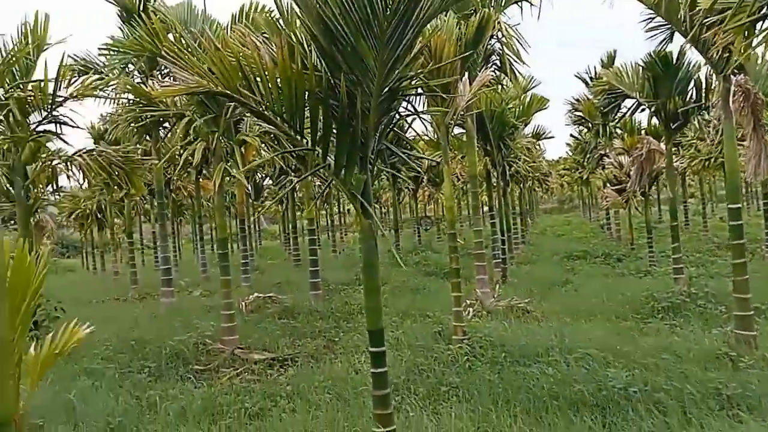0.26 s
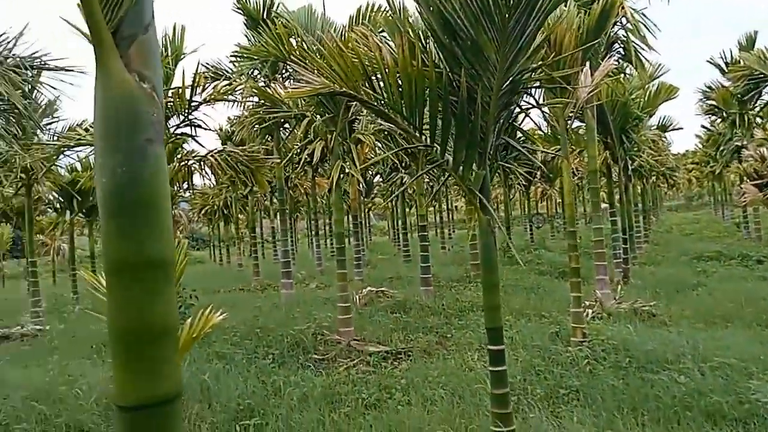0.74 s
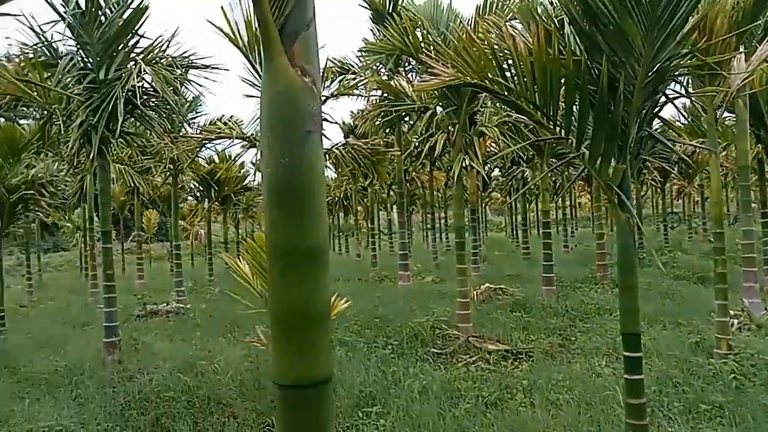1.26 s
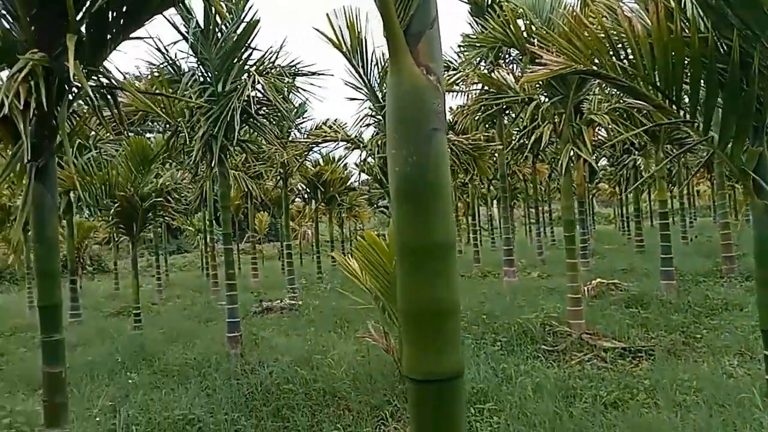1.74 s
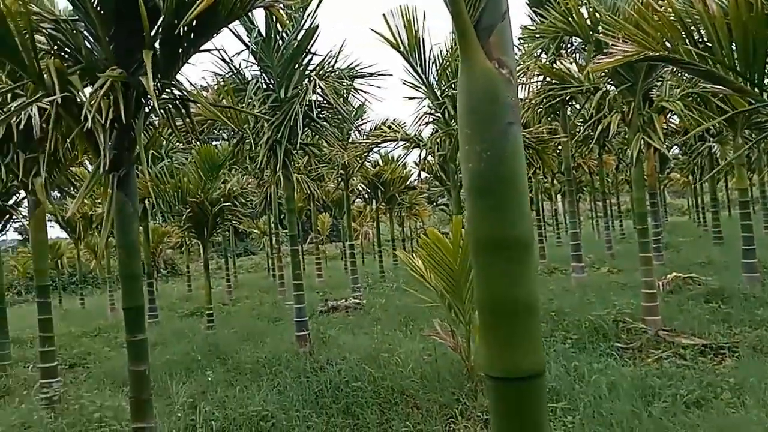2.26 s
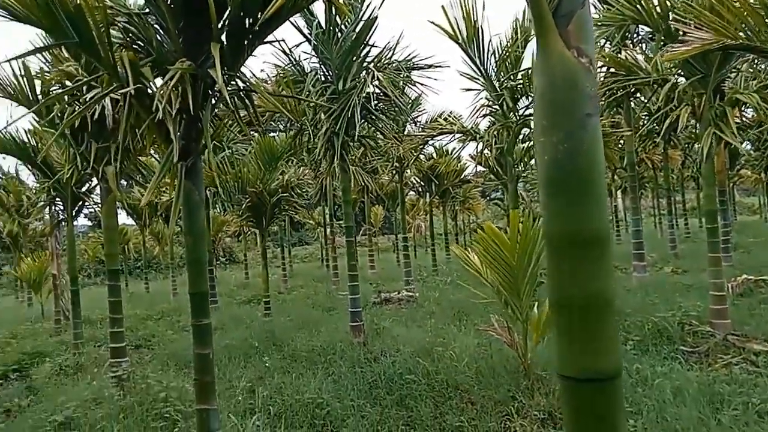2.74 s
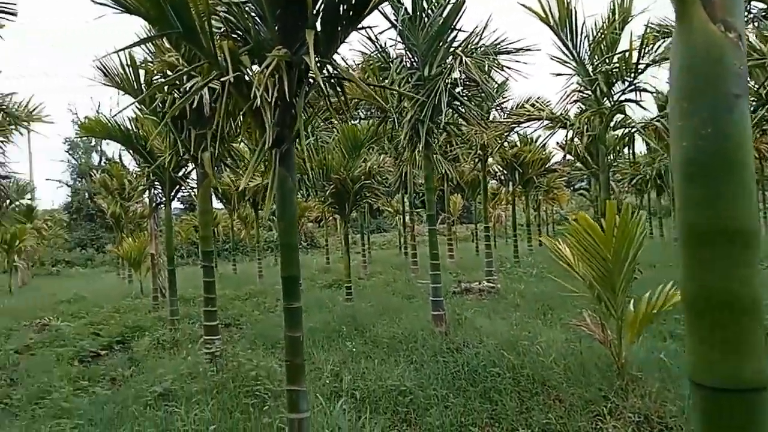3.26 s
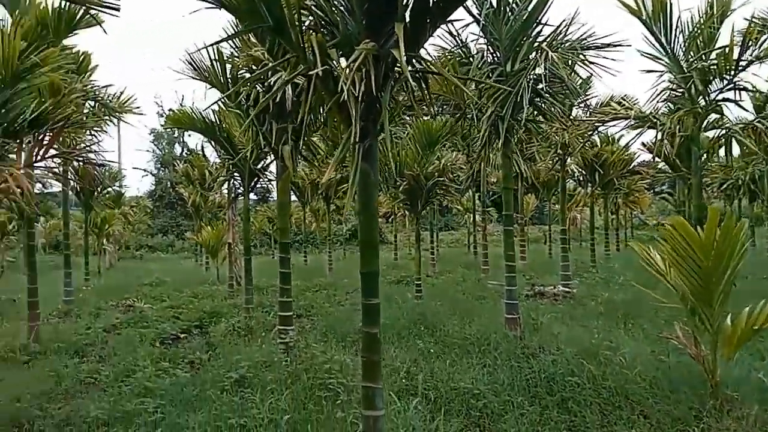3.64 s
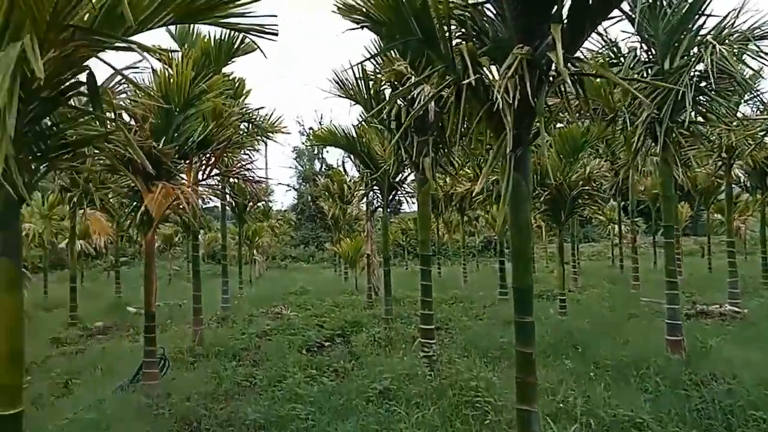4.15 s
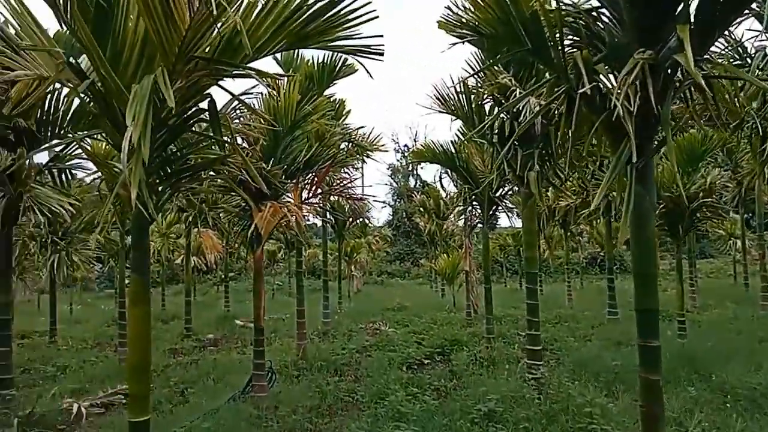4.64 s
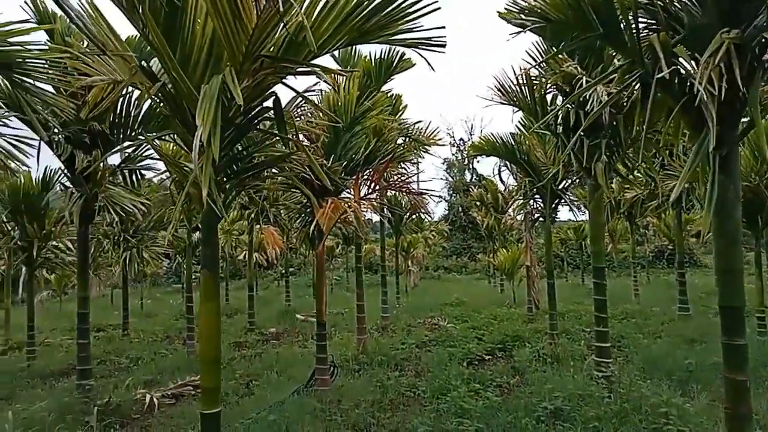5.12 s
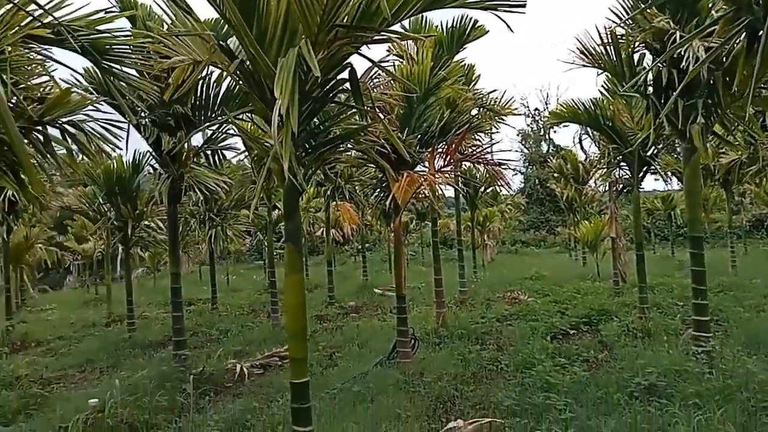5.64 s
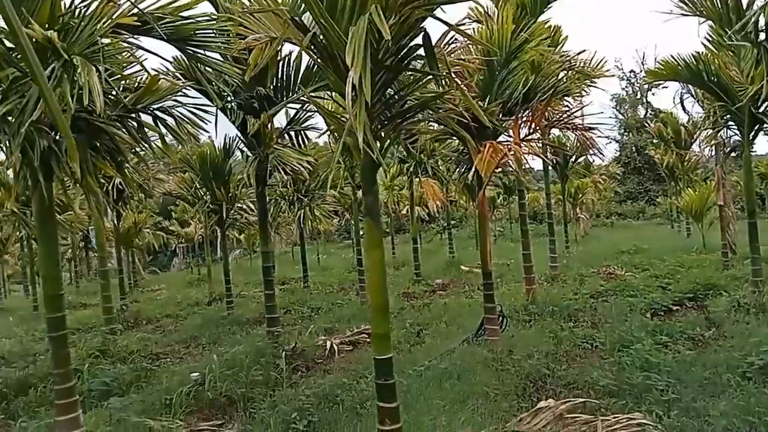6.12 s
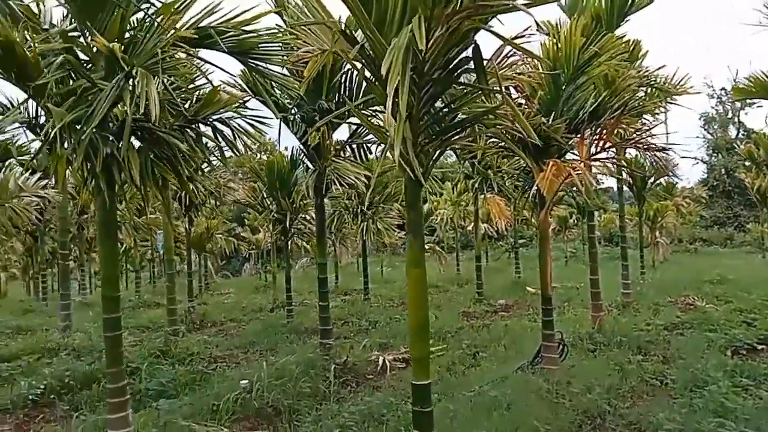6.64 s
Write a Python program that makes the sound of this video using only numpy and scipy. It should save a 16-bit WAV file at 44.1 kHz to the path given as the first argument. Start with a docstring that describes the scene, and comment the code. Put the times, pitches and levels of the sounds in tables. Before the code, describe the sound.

Outdoor insect chorus, thin and high, with low wind buffets early on, faint bird notes and chirps, then light crackles of brushed grass.

```python
"""Crickets in a windy palm grove

Heard on a walk with a hand-held phone. Crickets trill high and steadily: trains of gliding tone bursts.
A chirper and small birds call from afar: gated trills and near-sine glides, scattered by the grove.
Wind buffets the microphone, mostly in the first four seconds: pressure swings over low noise.
Later, grass rustles underfoot in bursts of crackle; a faint buzz and airy noise lie behind."""
import sys
import numpy as np
from scipy import signal
from scipy.io import wavfile
from scipy.ndimage import uniform_filter1d

SR = 44100
rng = np.random.default_rng(int(sys.argv[2]) if len(sys.argv) > 2 else 0)


def file_out(sig):
    """Save sig as 16-bit WAV at sys.argv[1]."""
    # one column per channel
    cols = np.atleast_2d(sig).T
    # limit, then scale
    lim = np.clip(cols, -1, 1)
    pcm = np.round(lim * 32767).astype(np.int16)
    wavfile.write(sys.argv[1], SR, pcm)


def gain_from_decibels(decibels):
    """Convert decibel values to linear amplitude factors."""
    exponent = np.asarray(decibels, float) / 20
    return 10 ** exponent


N = 303408
TIME = np.arange(N) / SR


def curve(rows):
    """Rows (time_s, value) joined by straight lines."""
    return np.interp(TIME, *np.transpose(rows))


def unit(x):
    """Scaled to rms 1."""
    return x / np.sqrt(np.mean(x ** 2))


def noise():
    """White noise over the whole scene."""
    return rng.standard_normal(N)


def band(x, lo_hz, hi_hz, order=2):
    """Butterworth band-pass."""
    edges_hz = [lo_hz, min(hi_hz, .45 * SR)]
    return signal.sosfilt(signal.butter(order, edges_hz, "band", fs=SR, output="sos"), x)


def walk(rate_hz):
    """Random levels, rate_hz a second, slewed twice; rms 1."""
    hold = int(SR / rate_hz)
    steps = np.repeat(rng.standard_normal(N // hold + 1), hold)
    return unit(uniform_filter1d(uniform_filter1d(steps, hold), hold)[:N])


def add(out, start_s, sound):
    """Mix a short sound in at start_s."""
    i = max(int(start_s * SR), 0)
    out[i:i + len(sound)] += sound[:N - i]


def foliage(x, t60_s, wet_db):
    """Trunks and fronds scatter sound into a diffuse tail, which keeps changing as the listener walks."""
    t = np.arange(int(t60_s * SR)) / SR
    turn = 2 * np.pi * np.cumsum(1.5 + 0.867 * walk(3.6)) / SR
    tails = rng.standard_normal((2, len(t))) * gain_from_decibels(-60 * t / t60_s) * (t > .003)
    tails = tails / np.linalg.norm(tails[0])
    shares = x * np.array([np.sin(turn), np.cos(turn)])
    wet = signal.oaconvolve(shares, tails, axes=1).sum(axis=0)[:N]
    return x + gain_from_decibels(wet_db) * wet


def trill(hz, rate_hz, glide_hz, duty, scatter_db, slip_rad, onset_hz=0):
    """Wing strokes: gliding tone bursts, sharp by onset_hz at first, random in size and phase; rms 1."""
    drift = walk(8)
    strokes = np.cumsum(rate_hz * (1 + .008 * drift)) / SR + rng.random()
    k = strokes.astype(int)
    u = np.minimum((strokes - k) / np.clip(duty, .1, 1), 1)  # 0..1 through the sounding part
    slip, size = rng.standard_normal((N // 100, 2)).T
    pitch_hz = hz * (1 + .004 * drift[::-1]) + glide_hz * (.5 - u)
    pitch_hz = pitch_hz + onset_hz * np.exp(-(u / .22) ** 2)
    phase = 2 * np.pi * np.cumsum(pitch_hz) / SR + slip_rad * np.cumsum(slip)[k]
    envelope = np.sin(np.pi * u ** 1.16) * gain_from_decibels(scatter_db * size)[k]
    return unit(envelope * np.sin(phase))


# spectrum of the airy noise, before overall scaling: freq_hz, density_db_per_hz
AIR_SPECTRUM = [(30, -13), (60, 4), (120, 5.5), (300, -1.5), (700, -3.5), (2000, -9), (4500, -7.5),
                (7700, -11.5), (11000, -30), (15300, 4.5)]
# level of distant leaves and air: time_s, level_db
AIR_LEVELS = [(0, -69), (3, -68), (3.85, -70), (4.6, -71), (6.88, -68)]


def air():
    """Half-octave-spaced noise bands of far leaves and microphone hiss; each flickers a little alone."""
    out = 0
    table_hz, table_db = np.transpose(AIR_SPECTRUM)
    for hz in 35 * 2 ** np.arange(0, 9, .5):
        db = np.interp(np.log(hz), np.log(table_hz), table_db) + 2.1 * walk(9.7)
        out = out + gain_from_decibels(db) * band(noise(), hz / 2 ** .25, hz * 2 ** .25, order=1)
    return out / np.std(band(out, 600, 4500)) * gain_from_decibels(curve(AIR_LEVELS))


# faint high buzz: time_s, level_db
BUZZ_LEVELS = [(0, -85), (1.3, -78), (2.4, -72.5), (3.4, -75), (3.7, -89)]


def buzz():
    """Broad dry rasp near the top of hearing: noise pulsed by strokes and a slower throb."""
    throb = 1 + .45 * np.cos(2 * np.pi * 8.4 * (TIME - 2.32) + .6 * walk(3))
    stroke_hz = 80 + 4 * walk(8.9)
    strokes = 1 + 0.64 * np.cos(2 * np.pi * np.cumsum(stroke_hz) / SR)
    return unit(band(noise(), 9600, 15000) * throb * strokes) * gain_from_decibels(curve(BUZZ_LEVELS))


# bird notes: start_s, length_s, start_hz, end_hz, level_db
BIRD_NOTES = [(.122, .04, 2380, 2720, -73), (.425, .018, 4130, 3950, -69), (.452, .02, 4800, 4700, -69),
              (.75, .025, 4150, 3950, -71), (.77, .025, 4480, 4800, -68), (1.068, .026, 4110, 3960, -68),
              (1.61, .09, 3600, 3440, -74), (1.847, .018, 2150, 2700, -61), (1.862, .043, 2800, 2790, -67),
              (1.972, .033, 1960, 1920, -68), (2.017, .042, 2430, 2400, -55), (2.155, .03, 1850, 2030, -70),
              (2.196, .048, 2380, 2420, -62.5), (3.22, .06, 2500, 2450, -75), (3.64, .04, 2850, 2950, -74),
              (3.976, .044, 4080, 3500, -72), (4.125, .042, 4000, 3400, -72),
              (4.165, .022, 3400, 2570, -73), (4.73, .067, 2740, 3350, -76), (6.14, .02, 4250, 4250, -71),
              (6.3, .08, 2200, 2030, -74)]
# long falling whistles: start_s, length_s, start_hz, end_hz, level_db, fall_time_in_lengths
FALLING_WHISTLES = [(4.95, 0.39, 4500, 3290, -75.5, .26), (5.61, .25, 4300, 3550, -76, 1.2),
                    (1.17, .08, 3500, 2950, -74, 3.0)]
ECHO_S, ECHO_DB = 0.06, -19  # a row of trunks throws the bird notes back


def birds():
    """Near-sine gliding notes with slight flutter and one echo; one call is a hoarse noise-band rasp."""
    out = np.zeros(N)
    waver_hz = 42 * walk(150)
    notes = [note + (2.5,) for note in BIRD_NOTES] + FALLING_WHISTLES
    for start_s, length_s, start_hz, end_hz, db, fall in notes:
        u = np.linspace(0, 1, int(length_s * SR))
        hz = end_hz + (start_hz - end_hz) * np.exp(-u / fall) * (1 - u)
        hz = hz + waver_hz[int(start_s * SR):][:len(u)]
        envelope = np.abs(np.sin(np.pi * u ** 0.66)) ** 0.29
        add(out, start_s, np.sqrt(2) * gain_from_decibels(db) * envelope * np.sin(2 * np.pi * np.cumsum(hz) / SR))
    out = out + gain_from_decibels(ECHO_DB) * np.roll(out, int(ECHO_S * SR))
    rasp_db = -70.5 - 240 * (TIME - 1.7) ** 2 / .5 ** 2
    rasp = unit(band(noise(), 3540, 3860)) * gain_from_decibels(rasp_db)
    return out * gain_from_decibels(2.8 * walk(120)) + rasp


# bouts of evenly spaced chirps, by key: s (start_s), count, db (first_db), step_db (growth_db_per_chirp)
CHIRP_BOUTS = [dict(s=.27, count=2, db=-73, step_db=-2), dict(s=.8, count=6, db=-71.5, step_db=-.5),
               dict(s=2.216, count=4, db=-70.5, step_db=-.3), dict(s=3.735, count=3, db=-75, step_db=4),
               dict(s=5.068, count=4, db=-68.5, step_db=-1.2),
               dict(s=6.455, count=3, db=-68.5, step_db=-1.8)]
CHIRP_GAP_S, CHIRP_S = .148, .082  # start to start; length


def chirper():
    """Short six-stroke chirps: a gated trill with a weaker, rougher band under the note."""
    gain = np.zeros(N)
    gate = signal.windows.tukey(int(CHIRP_S * SR), .3)
    for bout in CHIRP_BOUTS:
        for k in range(bout["count"]):
            add(gain, bout["s"] + k * CHIRP_GAP_S, gain_from_decibels(bout["db"] + k * bout["step_db"]) * gate)
    note = trill(5230, 75, 400, .65, 2.5, 1.5)
    under = trill(4850, 75, 400, .6, 3.0, 1.5)
    return gain * (note + gain_from_decibels(-7) * under)


# lower cricket chorus: time_s, level_db
CHORUS_LEVELS = [(0, -55), (.75, -57), (1.6, -59), (3.5, -61), (5.9, -63.5), (6.15, -61), (6.5, -62.5),
                 (6.88, -61)]
# its singers: pitch_hz, stroke_rate_hz
CHORUS_SINGERS = [(5980, 78), (6060, 156), (6250, 75), (6370, 157), (6400, 79), (6560, 69), (6680, 80),
                  (7040, 80)]


def chorus():
    """Crickets with own pitch and rate, strokes rising; those off mid-band are fainter and vary more."""
    voices = 0
    for hz, rate_hz in CHORUS_SINGERS:
        off = (hz / 450 - 13.9) ** 2
        level_db = (2.6 + 2.2 * off) * walk(11) - 7.6 * off
        voices = voices + gain_from_decibels(level_db) * trill(hz, rate_hz, -450, .65, 2.3, 1.5)
    return unit(foliage(voices, 0.08, -8.0)) * gain_from_decibels(curve(CHORUS_LEVELS))


# grass brushed by the walker: start_s, length_s, level_db, centre_hz
GRASS_BRUSHES = [(5.138, 0.0036, -58, 9000), (5.385, 0.12, -67, 4000), (5.456, 0.026, -62, 1290),
                 (5.459, .045, -60.5, 5000), (5.452, 0.13, -64, 9000), (5.522, 0.0081, -58, 2270),
                 (5.602, 0.06, -66, 2500), (5.622, 0.048, -65, 11000), (6.028, 0.057, -69.5, 2000),
                 (6.159, 0.095, -59, 2620), (6.205, 0.044, -65.5, 910), (6.292, 0.0062, -54, 8040),
                 (6.621, 0.027, -66, 1520), (6.711, 0.046, -66.5, 2900)]


def grass():
    """Each brush is a burst of tiny crackles, broad, with a hump where the blades ring."""
    out = np.zeros(N)
    for start_s, length_s, db, hz in GRASS_BRUSHES:
        brush_rng = np.random.default_rng(rng.integers(1 << 30))
        chance = brush_rng.standard_normal((2, int(length_s * SR)))
        clicks = chance[0] * gain_from_decibels(3.0 * chance[1])
        hump = unit(band(clicks, hz / 1.4, hz * 1.4))
        broad = unit(band(clicks, hz / 6, hz * 2.2, order=1))
        crackle = unit(hump + 1.7 * broad)
        add(out, start_s, gain_from_decibels(db) * crackle * np.hanning(len(crackle)) ** 0.35)
    return out


# puffs of wind: start_s, end_s, start_db, end_db
WIND_PUFFS = [(0, 0.177, -34, -45), (0.187, 0.31, -58, -44.5), (0.369, 0.422, -52.5, -56),
              (0.53, 0.794, -50, -43.5), (1.017, 1.071, -53, -43), (1.13, 1.185, -61, -59),
              (1.21, 1.281, -65, -45.5), (1.338, 1.41, -39.5, -54), (1.444, 1.508, -50.5, -50.5),
              (1.546, 1.798, -34.5, -31.5), (1.845, 2.075, -38, -42), (2.155, 2.282, -57.5, -61),
              (2.379, 2.491, -48.5, -38), (2.563, 2.938, -50, -37.5), (2.99, 3.188, -59.5, -42.5),
              (3.281, 3.505, -47, -40.5), (3.552, 3.95, -67, -67), (4.046, 4.248, -55.5, -48.5),
              (4.283, 4.496, -67, -68), (4.956, 5.462, -66, -79.5)]
GUST_RISE_S, GUST_FADE_S, CALM_DB = 0.013, 0.015, -84.5


def gust():
    """Turbulence gain: each puff comes up fast, grows or wanes and dies off over a faint calm."""
    gain = gain_from_decibels(CALM_DB) * np.ones(N)
    for start_s, end_s, start_db, end_db in WIND_PUFFS:
        rise = np.clip((TIME - start_s) / GUST_RISE_S + 1, 0, 1)
        fade = np.exp(-np.maximum(TIME - end_s, 0) / GUST_FADE_S)
        gain += gain_from_decibels(np.interp(TIME, [start_s, end_s], [start_db, end_db])) * rise * fade
    return gain


# strongest wind buffets: peak_s, peak_db, pitch_hz
WIND_BUFFETS = [(0.105, -33.5, 94), (0.589, -39, 112), (0.655, -29, 97), (0.735, -27, 158),
                (0.755, -25.5, 120), (0.792, -28, 136), (0.978, -37, 106), (1.212, -28, 118),
                (1.229, -28, 111), (1.575, -16, 137), (1.642, -19, 213), (1.668, -13.5, 160),
                (1.718, -15, 86.4), (1.76, -18, 124), (1.86, -22, 113), (1.9, -27, 114),
                (1.957, -28.5, 113), (2.404, -31.5, 109), (2.673, -28, 134), (2.774, -22.5, 160),
                (2.803, -24.5, 121), (2.872, -19, 104), (2.913, -22.5, 144), (3.418, -34.5, 111),
                (3.657, -42.5, 76), (4.048, -38.5, 82.5), (4.182, -39, 83.5)]


def wind():
    """Eddies break on the port: lone pressure swings over a lumpy rumble that brightens as it grows."""
    swings, swell = np.zeros(N), np.zeros(N)
    for peak_s, db, hz in WIND_BUFFETS:
        cycles = np.arange(-3, 3, hz / SR)
        shape = gain_from_decibels(db) * np.exp(-(cycles / 0.73) ** 2)
        start_s = peak_s + cycles[0] / hz
        add(swings, start_s, shape * np.cos(2 * np.pi * (cycles + rng.random())))
        add(swell, start_s, shape)
    lumps = gust() * gain_from_decibels(5.5 * np.minimum(walk(36), 1))
    low = lumps * unit(band(noise(), 61.0, 112.0))
    # the share of small eddies rises with the strength of the gust
    strength = np.abs(1.43 * lumps + swell)
    small = unit(band(noise(), 142, 244, order=3)) * gain_from_decibels(-8.5) * strength ** 1.33
    tiny = unit(band(noise(), 260, 480)) * gain_from_decibels(-15) * strength ** 1.9
    return band(swings + low + small + tiny, 38, 500, order=4)


# phrases of the near high cricket: start_s, end_s, level_db, swell_s, tiring_db_per_s
CRICKET_PHRASES = [(-.38, .468, -48, .35, 6), (.649, 1.492, -49, .5, 3.5), (1.665, 2.515, -50, .25, 2.5),
                   (2.685, 3.555, -52, .45, 5), (3.69, 4.67, -56.5, .45, 5), (4.81, 6.9, -61, .3, .2)]
PHRASE_RATE_HZ = 143.5  # wing strokes once a phrase has sped up
SWELL_DB, ACCENT_DB, ACCENT_S = 7.5, 2.5, 0.028  # a phrase opens under its level, with a short accent


def high_cricket():
    """One near singer in phrases that start slow and speed up, over far ones that never pause."""
    gain, rate_hz = np.zeros(N), np.full(N, 140.)
    for start_s, end_s, db, swell_s, tiring in CRICKET_PHRASES:
        on = (TIME >= start_s) & (TIME <= end_s)
        since_s = TIME[on] - start_s
        swell_db = -SWELL_DB * np.exp(-(since_s / swell_s) ** 2)
        accent_db = ACCENT_DB * np.exp(-since_s / ACCENT_S)
        gain[on] = gain_from_decibels(db + swell_db + accent_db - tiring * since_s)
        rate_hz[on] = PHRASE_RATE_HZ - 9 * np.exp(-since_s / .35)
    gain = uniform_filter1d(gain, size=300)  # phrases start and stop within a stroke
    near = gain * trill(9340, rate_hz, glide_hz=560, duty=.8, scatter_db=2.0, slip_rad=1.5, onset_hz=700)
    far = trill(9250, 139, 640, .7, 1.0, 1.594) + trill(9550, 220, 640, .7, 1.0, 1.594)
    return foliage(near + far * gain_from_decibels(-69.0 + 2.0 * walk(3.2)), 0.12, -8)


def scene():
    """All sources reach one microphone; chirper, birds and grass share the scatter of the grove."""
    scattered = foliage(birds() + chirper() + grass(), .16, -2.5)
    mix = air() + buzz() + scattered + chorus() + wind() + high_cricket()
    return mix[None]


def top_cut(x):
    """Nothing passes above the cut-off."""
    return signal.sosfilt(signal.butter(12, 15420, fs=SR, output="sos"), x)


def record(dry):
    """The finished mix as the phone stores it."""
    return top_cut(dry)


dry = scene()
out = record(dry)
file_out(out)
```